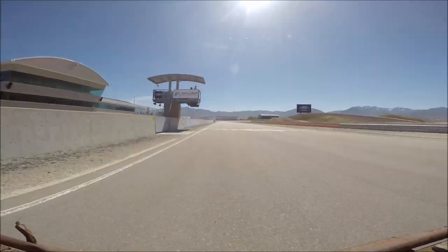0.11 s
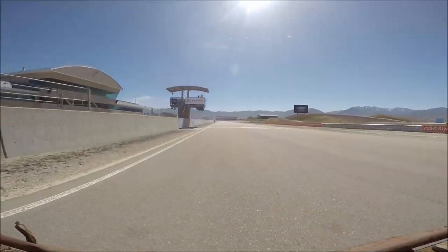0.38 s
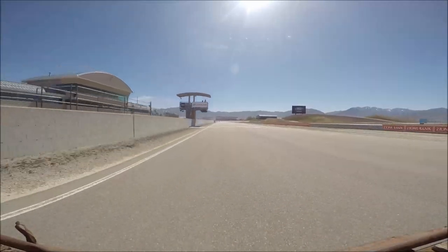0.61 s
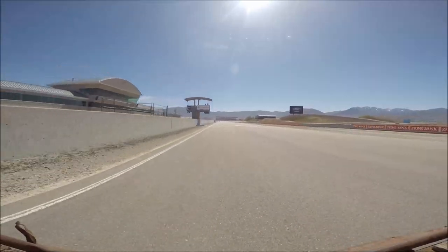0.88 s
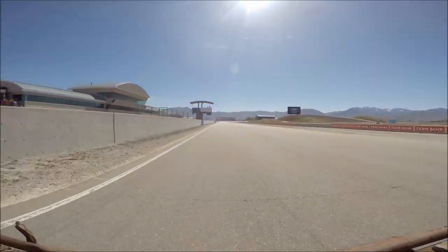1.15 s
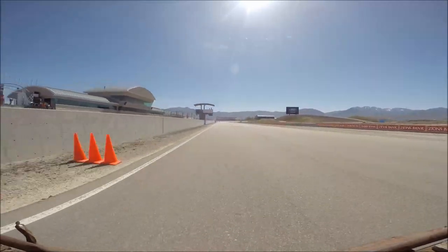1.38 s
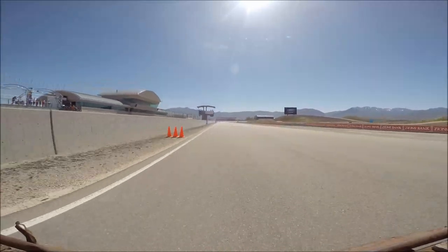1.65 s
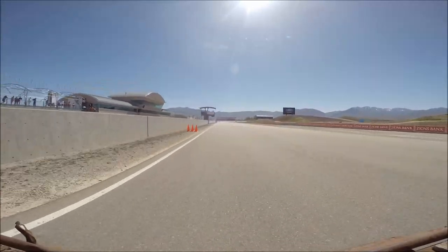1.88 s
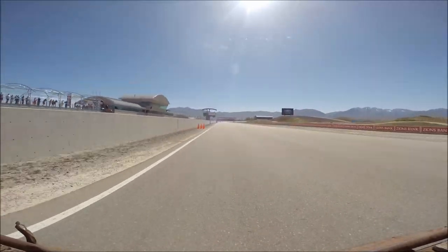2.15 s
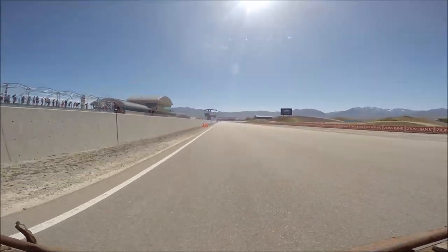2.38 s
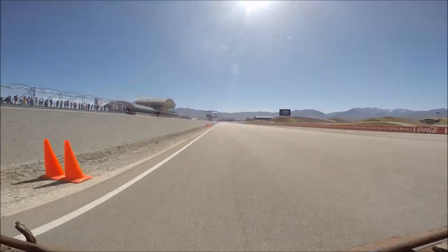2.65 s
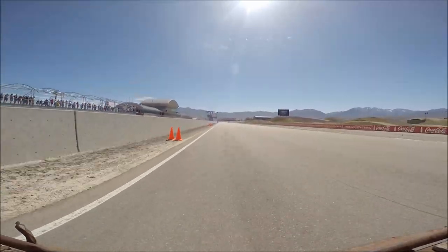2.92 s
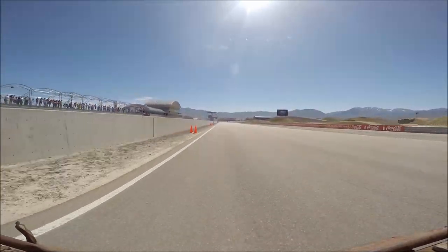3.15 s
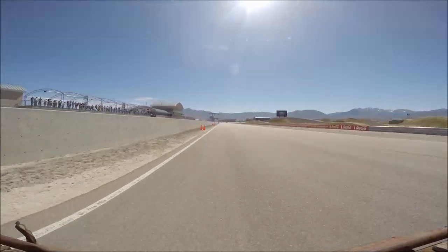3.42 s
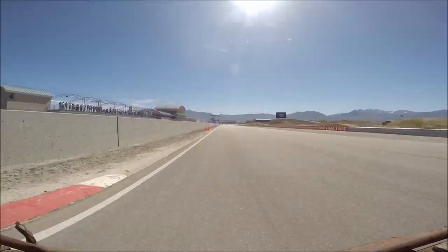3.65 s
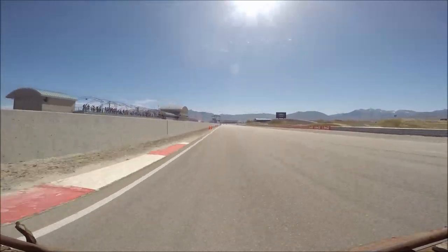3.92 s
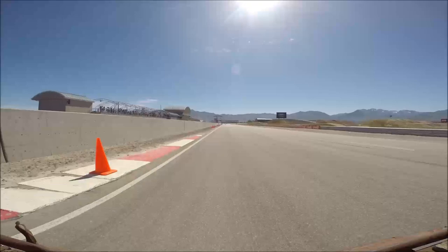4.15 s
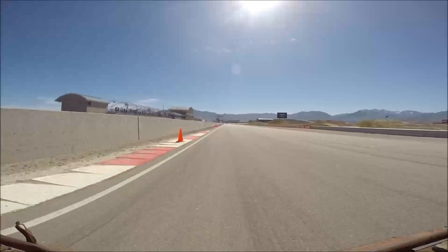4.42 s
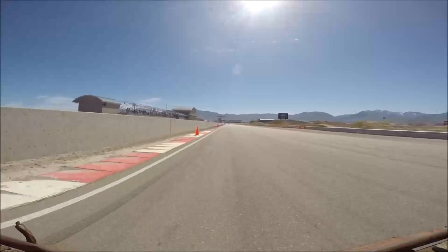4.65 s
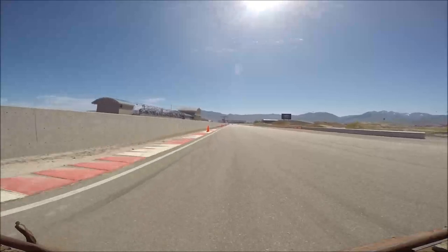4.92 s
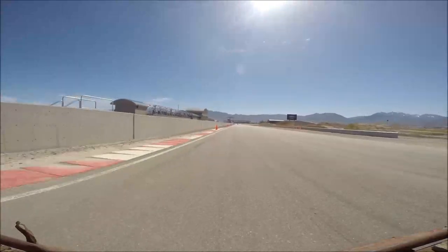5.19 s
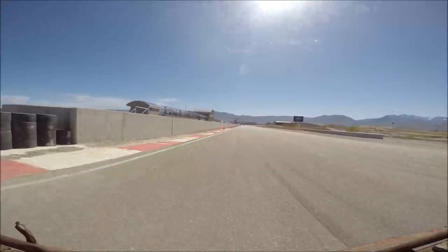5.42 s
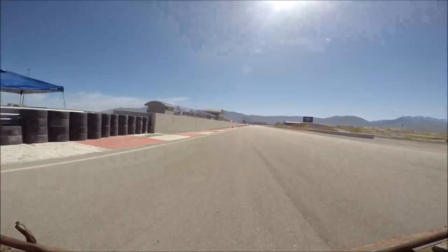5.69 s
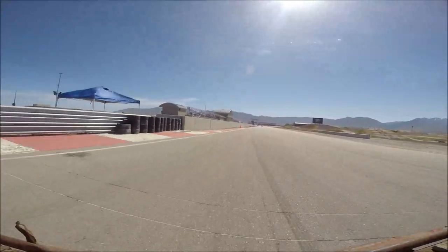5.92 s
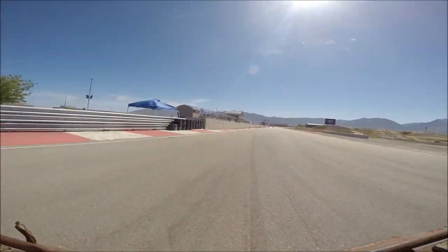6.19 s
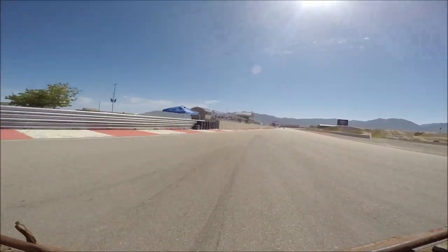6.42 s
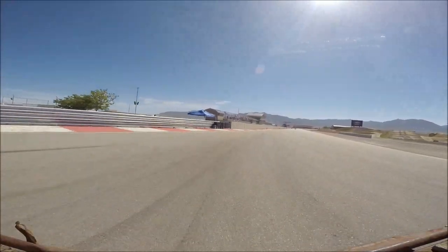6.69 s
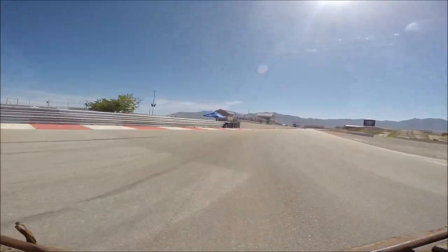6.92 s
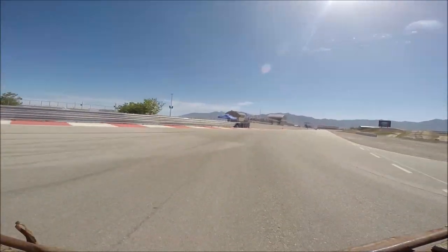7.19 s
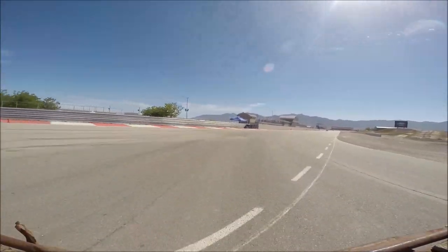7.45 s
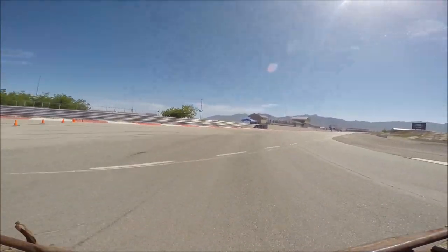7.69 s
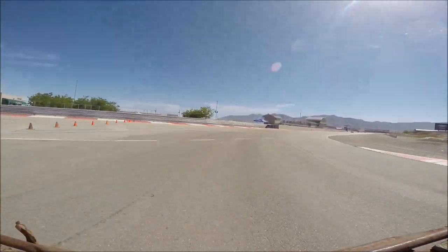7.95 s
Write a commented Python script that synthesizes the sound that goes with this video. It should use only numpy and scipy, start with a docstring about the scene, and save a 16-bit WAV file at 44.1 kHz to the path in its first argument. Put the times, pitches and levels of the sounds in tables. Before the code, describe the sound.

An old pickup drones down a race straight with buzzing sheet metal and ticking loose fitting, then eases off, knocks in the driveline and jolts over bumps.

```python
"""A droning hum with a sheet-metal buzz: an old pickup on a race straight, heard by a microphone bolted to its bed.
Road noise excites the resonances of frame and bed panels, the drive shaft adds tones on its orders, filtered
noise gives an exhaust roar, wind thumps and hiss, and a loose fitting ticks as struck decaying modes.
Noise bursts then jolt the panels; as the truck slows for a bend, slack knocks once a turn in runs, and two
short tone pairs squeak."""
import sys
import numpy as np
from scipy import signal
from scipy.io import wavfile
from scipy.ndimage import uniform_filter1d, minimum_filter1d

SR = 44100
rng = np.random.default_rng(int(sys.argv[2]) if len(sys.argv) > 2 else 0)


def natural_amplitude(level_db):
    """Convert a level in decibels to a linear amplitude factor, elementwise."""
    exponent = np.asarray(level_db, float) / 20
    return 10 ** exponent


def master_out(mix):
    """Clip the mix to full scale and print it as 16-bit PCM to the path in sys.argv[1]."""
    frames = np.transpose(np.atleast_2d(mix))
    ceiling = np.clip(frames, -1, 1)
    pcm = np.round(ceiling * 32767).astype(np.int16)
    wavfile.write(sys.argv[1], SR, pcm)


N = 355887
# the throttle starts to close, the clutch goes down, and the time a change of load takes
LIFT_OFF_S, DECLUTCH_S, SWITCH_S = 1.6, 5.1, 0.3


def rms_one(x):
    """Normalisation: scales a signal to rms 1."""
    return x / np.sqrt(np.mean(x ** 2) + 1e-20)


def in_time(rows):
    """Linear interpolation: the columns of a table, one value per sample."""
    s, *columns = np.transpose(rows)
    return [np.interp(np.arange(N) / SR, s, c) for c in columns]


def ramp(start, length):
    """Linear transition: 0 before the start, then a straight rise to 1 (both in s)."""
    return np.clip((np.arange(N) / SR - start) / length, 0, 1)


def drift(rate):
    """Low-pass random process: noise twice through one pole, spread 1; a higher rate moves faster."""
    r = np.exp(-80 * np.pi * rate / SR)
    noise = rng.standard_normal(N // 40 + 2002)   # one value per 40 samples
    slow = signal.lfilter([1], [1, -2 * r, r * r], noise)[2000:]
    return np.interp(np.arange(N) / 40, np.arange(len(slow)), rms_one(slow))


def band(x, order, low_hz, high_hz):
    """Band limitation: a Butterworth band-pass."""
    return signal.sosfilt(signal.butter(order, [low_hz, high_hz], "band", fs=SR, output="sos"), x)


def resonance(x, hz, width_hz):
    """Damped resonator: a two-pole peak with gain 1 on top."""
    r = np.exp(-np.pi * width_hz / SR)
    peak_gain = (1 - r * r) / 2
    return signal.lfilter([peak_gain, 0, -peak_gain], [1, -2 * r * np.cos(2 * np.pi * hz / SR), r * r], x)


def body(x, modes, skirt, patchy_db):
    """Modal superposition: each mode swells and fades by itself as the load on the joints shifts."""
    click, out, ring = np.arange(16384) == 0, 0, 0
    for k, (hz, width, db) in enumerate(modes):
        gain = (-1) ** k * natural_amplitude(db)
        # a second, wider resonance keeps the valleys between the peaks dark
        mode = resonance(resonance(x + 1e-18, hz, width), hz, skirt * width)
        out += gain * natural_amplitude(patchy_db * drift(4.2)) * mode
        ring += gain * resonance(resonance(click + 1e-18, hz, width), hz, skirt * width)
    return out / np.sqrt(np.sum(ring ** 2))   # noise keeps its rms, apart from the swelling


# road shake: (time [s], frame drive level [dB], panel drive level before the quieter coast [dB])
ROAD_SHAKE = [(0.0, -14.5, -24.5), (1.63, -16.5, -27.5), (2.97, -14.5, -24), (5.97, -14.5, -26),
              (6.22, -12.5, -23.5), (6.6, -18, -31), (8.03, -11.5, -24)]


def road_levels():
    """Broadband excitation: the road's drive of frame and panels, the panels quieter while coasting."""
    coast_s, coast_quiet_db = 3.6, 4
    frame_db, panel_db = in_time(ROAD_SHAKE)
    coasting = ramp(coast_s, SWITCH_S) - ramp(DECLUTCH_S, SWITCH_S)
    return frame_db, panel_db - coast_quiet_db * coasting


# frame resonances: (frequency [Hz], width [Hz], relative level [dB])
FRAME_MODES = [(41.3, 10, -8), (59.3, 5.4, -2), (97.1, 8.6, -4.5), (130.03, 5.37, 4.5), (152.7, 33, -6.5),
               (171.56, 19.94, -1.5), (203.5, 17.5, -17)]


def frame(level_db, bumps):
    """Forced resonance: road noise and bumps shake the frame."""
    shake = natural_amplitude(level_db) * rng.standard_normal(N) + natural_amplitude(7.0) * bumps
    return body(shake, FRAME_MODES, skirt=4.7, patchy_db=1.5)


# drive shaft speed: (time [s], turn rate [turns/s])
SHAFT_SPEED = [(0, 39.05), (2.2, 38.6), (3.0, 37.7), (3.5, 36.3), (3.8, 33.93), (5.4, 30.68), (6.6, 32.0)]


def shaft_turns():
    """Phase is the integral of frequency: turns made so far."""
    return np.cumsum(in_time(SHAFT_SPEED)[0]) / SR


# shaft orders: (multiple of the turn rate [1], rms level before load changes and drift [dB])
SHAFT_ORDERS = [(1, -24), (1.5, -32), (2, -34), (2.5, -24), (3, -30), (4, -30), (4.5, -24), (5, -35)]


def shaft_hum(turns):
    """Order excitation: unbalance and firing give tones on whole and half multiples of the turn rate."""
    lift_takes_s, half_loss_db, whole_gain_db = 2.8, 19, 8
    first_out_s, first_back_s, first_loss_db = 4.3, 6.6, 14
    declutch_loss_db = 21
    lifted = ramp(LIFT_OFF_S, lift_takes_s)
    # as the throttle closes the half orders die away, and the first two whole ones gain half of whole_gain_db
    half_db = -half_loss_db * lifted
    dropped_out = ramp(first_out_s, SWITCH_S) - ramp(first_back_s, SWITCH_S)
    first_db = .5 * whole_gain_db * lifted - first_loss_db * dropped_out
    # the higher whole orders swell just before the first two drop out, and sink with the clutch
    whole_db = whole_gain_db * ramp(first_out_s - SWITCH_S, SWITCH_S)
    whole_db = whole_db - declutch_loss_db * ramp(DECLUTCH_S, SWITCH_S)
    out = np.zeros(N)
    for multiple, db in SHAFT_ORDERS:
        wobble = 2 * np.pi * rng.random() + .12 * multiple * drift(1.5)   # phase [rad]
        if multiple % 1:
            load_db = half_db
        else:
            load_db = whole_db if multiple > 2 else first_db
        level = natural_amplitude(db + load_db + 2.1 * drift(1.8)) * np.sqrt(2)   # rms to peak
        out += level * np.sin(2 * np.pi * multiple * turns + wobble)
    return out


# bed panel resonances: (frequency [Hz], width [Hz], relative level [dB])
PANEL_MODES = [(326, 220, -27), (400.3, 18.7, -3), (456.4, 28, -9), (508, 14, -5.5), (527, 20, -6.5),
               (605.6, 54, -3.5), (771.5, 45.4, 0), (859.4, 55.5, 1.5), (950.3, 26, -5), (1015, 76, -8.5),
               (1202, 61, -14.5), (1321, 69, -13), (1463, 40, -16.5), (1615, 190, -20), (2185, 190, -32),
               (2583, 84, -32), (2990, 530, -47.5), (3750, 1300, -48.5), (5140, 910, -54), (6300, 290, -55),
               (9800, 2500, -63.5)]


def panels(level_db, knocks, bright, dull):
    """Shared modal response: gritty road buzz, knocks and bumps all ring the same sheet metal."""
    low_panels_hz, thud_db, jangle_db = 620, 7, -28.5
    flap_hz, flap_width_hz, flap_db = 1265, 40, 7
    grit = natural_amplitude(1.6 * drift(58.0) + 0.39 * drift(3.6))   # small contacts come in clumps
    drive = natural_amplitude(level_db) * rms_one(grit) * rng.standard_normal(N) + knocks
    high_pass = signal.butter(2, low_panels_hz * 0.68, "high", fs=SR, output="sos")
    drive = drive + signal.sosfilt(high_pass, bright)
    # small parts jangle in the treble under a bump
    jangle = natural_amplitude(jangle_db + 5.0 * drift(90.0)) * band(bright, 2, 2000, 5600)
    # part of a bump comes straight up the mount without ringing the panels
    thud = band(dull, 4, 280, 640) + band(bright, 4, 700, 980)
    # a small flap rings only under bumps
    flap = resonance(resonance(bright, flap_hz, flap_width_hz), flap_hz, 3 * flap_width_hz)
    thud += natural_amplitude(flap_db) * flap
    low_modes = [mode for mode in PANEL_MODES if mode[0] < low_panels_hz]
    ringing = body(drive, PANEL_MODES, skirt=3.0, patchy_db=1.1)
    low_ringing = body(dull, low_modes, skirt=3.0, patchy_db=1.1)
    return jangle + natural_amplitude(thud_db) * thud + ringing + low_ringing


def roar():
    """Band-limited flow noise: exhaust in the low middle, fading just before the throttle starts to close."""
    start_db, loss_db = -42, 15
    level_db = start_db - loss_db * ramp(LIFT_OFF_S - 2 * SWITCH_S, 2 * SWITCH_S)
    return natural_amplitude(level_db) * rms_one(band(rng.standard_normal(N), 2, 178, 322))


def wind():
    """Turbulent pressure: lumpy low noise on the housing, mostly below the frame's notes."""
    low = band(rng.standard_normal(N), 3, 9, 30.6)
    return natural_amplitude(-26.5 + 3.0 * drift(1.0)) * rms_one(low)


def hiss():
    """White noise: a faint steady floor."""
    return natural_amplitude(-86.5) * rng.standard_normal(N)


# strikes of the loose fitting: (time [s], strike strength [dB])
FITTING_STRIKES = [(0.0338, -33.5), (0.2307, -36), (0.2842, -29), (0.319, -32), (0.5161, -29),
                   (0.549, -38.5), (0.595, -33), (0.671, -38), (0.7761, -28), (0.8859, -35), (0.931, -34),
                   (0.9657, -33.5), (1.1695, -35), (1.3022, -45), (1.4683, -38), (1.8169, -29.5),
                   (1.8566, -36.5), (1.947, -36.5), (2.1406, -31.5), (2.4153, -37.5), (2.5773, -34),
                   (2.7332, -33.5), (2.855, -25.5), (3.0918, -32.5), (3.1324, -32), (3.166, -35.5),
                   (3.211, -38), (3.251, -30.5), (3.3487, -30.5), (3.5422, -44), (3.728, -45.5),
                   (3.85, -32.5), (3.9817, -46), (4.3215, -41), (4.374, -31.5), (4.4134, -36.5),
                   (4.474, -41.5), (4.557, -35), (4.6157, -40), (4.6605, -40.5), (4.716, -41.5),
                   (4.954, -47), (5.0016, -34), (5.043, -40), (5.1402, -34.5), (5.3292, -31), (5.388, -31),
                   (5.497, -45), (5.5359, -34.5), (5.557, -41.5), (5.7053, -40.5), (5.7416, -36),
                   (5.899, -29.5), (6.011, -32), (6.0823, -31.5), (6.115, -27), (6.245, -36.5),
                   (6.2748, -30.5), (6.3924, -41), (6.429, -41), (6.4594, -41.5), (6.5544, -40),
                   (6.599, -42), (6.68, -38), (6.7418, -37.5), (6.7982, -37.5), (6.8663, -33.5),
                   (7.0534, -33), (7.102, -35), (7.268, -38), (7.501, -43), (7.533, -43), (7.5602, -29.5),
                   (7.663, -30.5), (7.7466, -44.5), (7.787, -38), (7.8514, -41), (7.899, -37.5),
                   (7.915, -41.5), (7.9693, -35.5)]
# modes of the loose fitting: (frequency [Hz], relative level [dB], 60 dB decay time before the mount [s])
FITTING_MODES = [(1651, 11, 0.025), (2174, 6, 0.013), (2934, -8, 0.018), (3305, -4.5, 0.019),
                 (4054, -0.5, 0.0068), (4540, -10.5, 0.012), (5100, -12, 0.017), (6080, -9, 0.0057),
                 (6640, -14.5, 0.0065), (8660, -7, 0.007), (9940, 8.5, 0.0023)]


def fitting():
    """Impact excitation: listed and random faint strikes ring its modes; harder contact is sharper."""
    faint_count, faint_db, faint_range_db = 300, -59, 15
    sharp_above_hz = 7000
    lag_s, evens = 0.004, 0.35   # the lowest mode answers late and rings well under soft strikes too
    crack_db, crack_t60_s = -11.5, 0.032
    s, db = np.transpose(FITTING_STRIKES)
    faint = rng.random((faint_count, 2))
    s = np.r_[s, faint[:, 0] * (N - 1) / SR]
    db = np.r_[db, faint_db + faint_range_db * faint[:, 1] ** 2]
    colour_db = 2.2 * rng.standard_normal((len(s), len(FITTING_MODES)))
    skid = rng.standard_normal(N)
    out = np.zeros(N)
    for k, (hz, mode_db, t60) in enumerate(FITTING_MODES):
        lowest = k == 0
        sharp_db = (.5 * (db + 30.5) - 4.0) * (hz > sharp_above_hz)
        sharp_db = sharp_db - evens * (db + 34.5) * lowest
        at = np.minimum((s + lag_s * lowest) * SR, N - 1).astype(int)
        clicks = np.full(N, 1e-18)
        clicks[at] = natural_amplitude(db + mode_db + colour_db[:, k] + sharp_db)
        # after the first touch the contact skids for about a millisecond
        skid_level = signal.lfilter([1], [1, -np.exp(-1 / (.001 * SR))], clicks)
        contact = clicks + natural_amplitude(-22) * skid * skid_level
        r, w = natural_amplitude(-60 / (t60 * SR)), 2 * np.pi * hz / SR
        ring = signal.lfilter([0, np.sin(w)], [1, -2 * r * np.cos(w), r * r], contact)
        out += resonance(ring, hz, 4.0 / t60)   # the ring swells through the mount
    touch = np.full(N, 1e-18)   # the touch itself is a short broad crack
    touch[(s * SR).astype(int)] = natural_amplitude(db + crack_db + .5 * colour_db[:, 4])
    crack = skid * signal.lfilter([1], [1, -natural_amplitude(-60 / (crack_t60_s * SR))], touch)
    return out + band(crack, 2, 1710, 6500)


# bumps: (time [s], nominal level [dB], decay length [s], dullness: share of power to the low panels [0-1])
BUMPS = [(2.126, -16, 0.0076, 0.06), (2.224, -13.5, 0.028, 0.1), (2.284, -16.5, 0.0037, 0),
         (3.797, -18.5, 0.067, 0), (5.56, -14.5, 0.053, 0.74), (5.581, -11.5, 0.0098, 0.06),
         (5.595, -11.5, 0.011, 0.2), (5.62, -20, 0.012, 0), (6.098, -13.5, 0.02, 0.14),
         (6.301, -12.5, 0.01, 0.17), (6.335, -19, 0.0067, 0.6), (6.379, -15, 0.013, 0.44),
         (6.402, -14.5, 0.019, 0.1), (6.454, -17, 0.0033, 0.2), (6.596, -18.5, 0.013, 0.3),
         (6.68, -21, 0.04, 0.07), (7.007, -16.5, 0.059, 0.62), (7.19, -17, 0.023, 0.47),
         (7.252, -19, 0.031, 0.2), (7.436, -9, 0.007, 0.56), (7.55, -21.5, 0.04, 0.13)]


def jolts():
    """Transient excitation: a blow and a dying shudder, split between the high panels and the low ones."""
    blow_width = 21   # samples
    t, out = np.arange(N) / SR, np.zeros((2, N))
    shudder = rng.standard_normal((2, N))
    for s, db, length, dullness in BUMPS:
        age = np.maximum(t - s, 0) / max(length, .003)
        shape = natural_amplitude(db - 4) * np.minimum(age * 4, 1) * np.exp(-age) * shudder
        start = int(s * SR)
        shape[:, start:start + blow_width] = natural_amplitude(db - 1) * np.hanning(blow_width)
        out += np.sqrt([[1 - dullness], [dullness]]) * shape
    return signal.sosfilt(signal.butter(1, 6000, fs=SR, output="sos"), out)   # tyres blunt the blow


# runs of slack knocks: (start [s], length [s], first relative level [dB], last relative level [dB])
KNOCK_RUNS = [(3.765, 0.14, -11, -19), (4.085, 0.095, -15, -14), (4.206, 0.37, -18, -22.5),
              (4.538, 0.14, -16, -16), (4.687, 0.16, -17.5, -27.5), (4.851, 0.38, -17, -16)]


def slack(turns):
    """Backlash impact: with the load off, play in the drive line knocks once a turn, nearly on time."""
    drive_gain_db = 22
    blows = np.zeros(N)
    wander = .015 * drift(9.0)   # turns
    chance_db = 1.2 * rng.standard_normal(N)
    for s, length, first_db, last_db in KNOCK_RUNS:
        run = np.arange(int(s * SR), int((s + length) * SR))
        turned = turns[run] - turns[run[0]] + wander[run] - wander[run[0]]
        whole_turns = np.maximum.accumulate(np.floor(turned))
        at = run[np.flatnonzero(np.diff(whole_turns, prepend=-1))]
        level_db = np.interp(at, run[[0, -1]], [first_db, last_db])
        blows[at] = natural_amplitude(level_db + drive_gain_db + chance_db[at])
    return band(blows, 2, 620, 1000)


# metal squeaks: (time of the middle [s], frequency [Hz], peak level of the lower tone [dB], Gaussian length [s])
SQUEAK_TONES = [(4.99, 5270, -53, 0.006), (5.668, 4245, -51, 0.0049)]


def squeaks():
    """Frictional slip: metal on metal gives a short tone with its octave."""
    octave_db = -3
    t, out = np.arange(N) / SR, np.zeros(N)
    for s, hz, db, length in SQUEAK_TONES:
        tone = np.sin(2 * np.pi * hz * t) + natural_amplitude(octave_db) * np.sin(4 * np.pi * hz * t)
        out += natural_amplitude(db) * np.exp(-((t - s) / length) ** 2) * tone
    return out


def scene():
    """Linear superposition: all sources add at one microphone."""
    frame_db, panel_db = road_levels()
    turns = shaft_turns()
    bright, dull = jolts()
    truck = frame(frame_db, bright + dull) + shaft_hum(turns)
    truck = truck + panels(panel_db, slack(turns), bright, dull)
    mix = truck + roar() + wind() + hiss() + fitting() + squeaks()
    return mix[None]   # one channel


def band_limit(x):
    """A steep low-pass at the top of the band."""
    return signal.sosfilt(signal.butter(12, 11750, fs=SR, output="sos"), x)


def record(dry):
    """Look-ahead limiting: the gain ducks ahead of peaks; then a short end fade and a treble cut."""
    room = np.minimum(1, natural_amplitude(-1.8) / (np.abs(dry) + 1e-9))
    gain = uniform_filter1d(minimum_filter1d(room, size=441), size=441)   # 10 ms windows
    gain = gain * (1 - ramp(N / SR - .004, .004))
    top_cut = signal.cheby2(8, 32, 11100, fs=SR, output="sos")
    return band_limit(signal.sosfilt(top_cut, dry * gain))


dry = scene()
out = record(dry)
master_out(out)
```